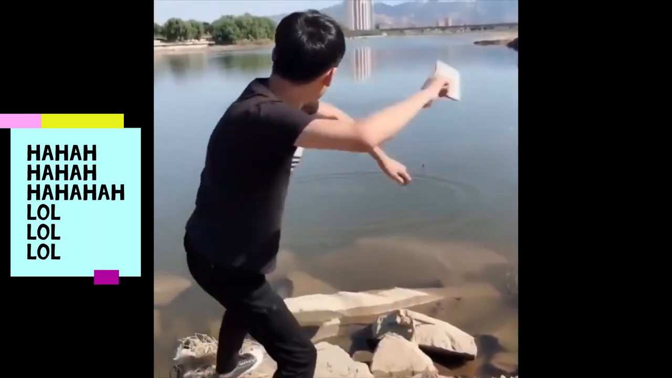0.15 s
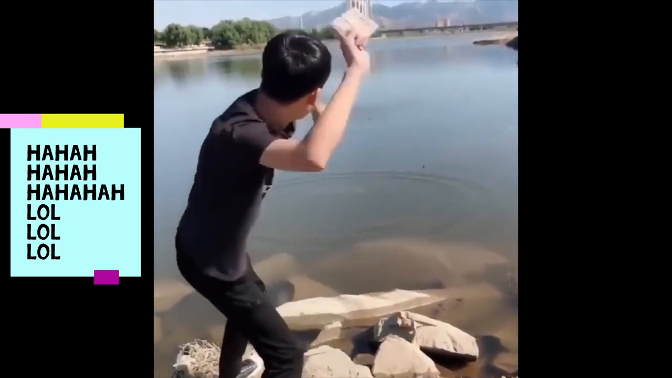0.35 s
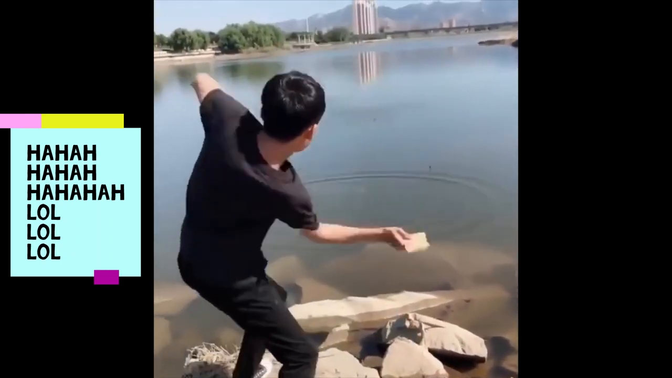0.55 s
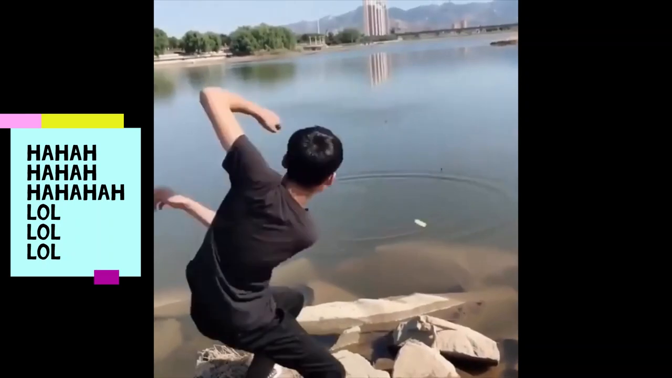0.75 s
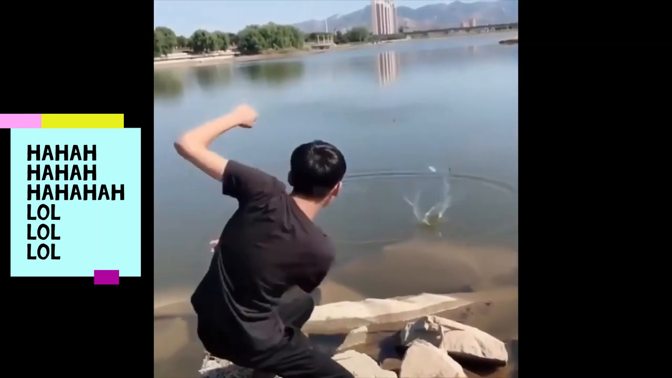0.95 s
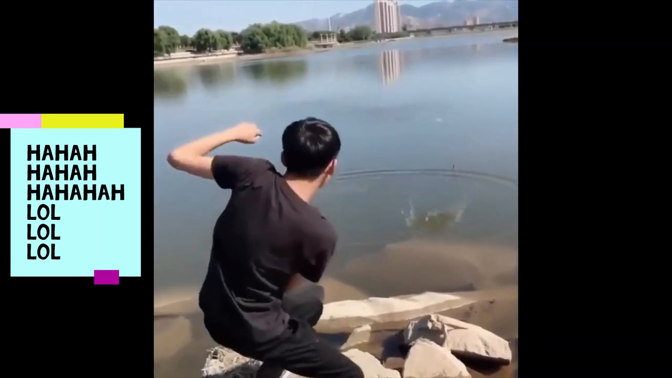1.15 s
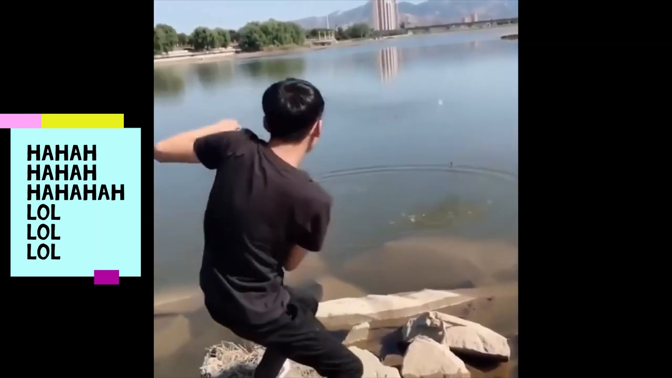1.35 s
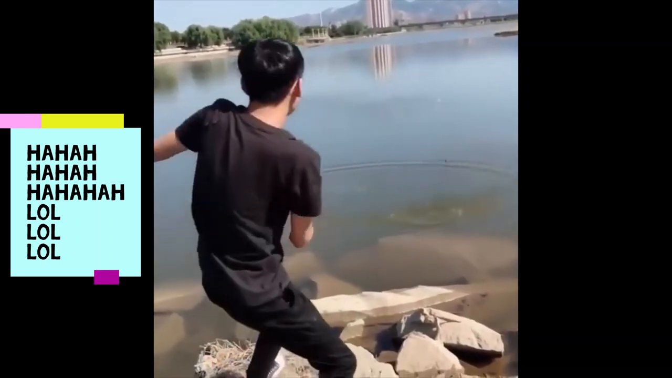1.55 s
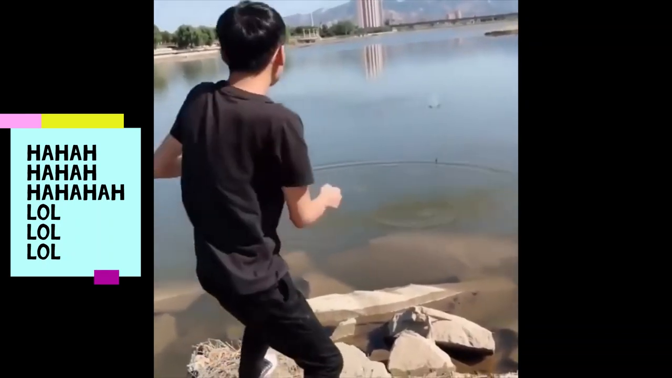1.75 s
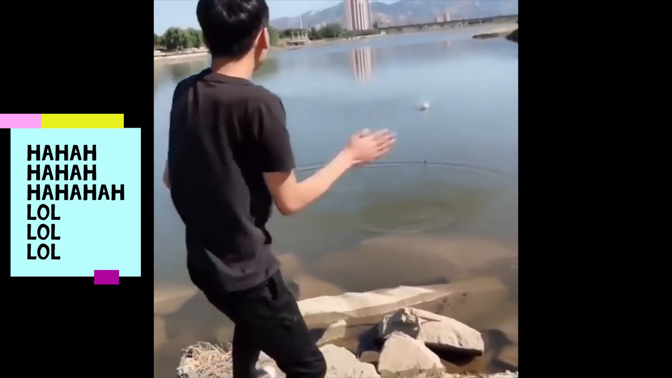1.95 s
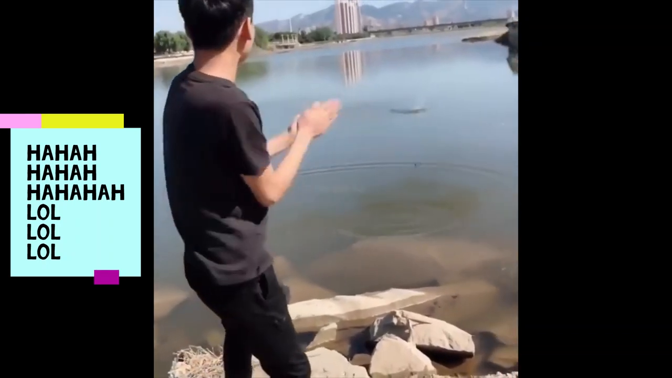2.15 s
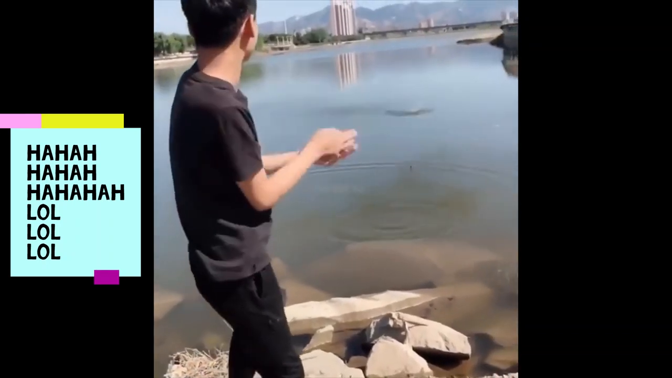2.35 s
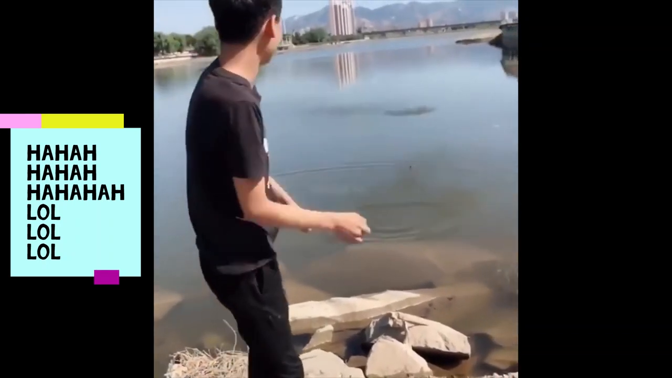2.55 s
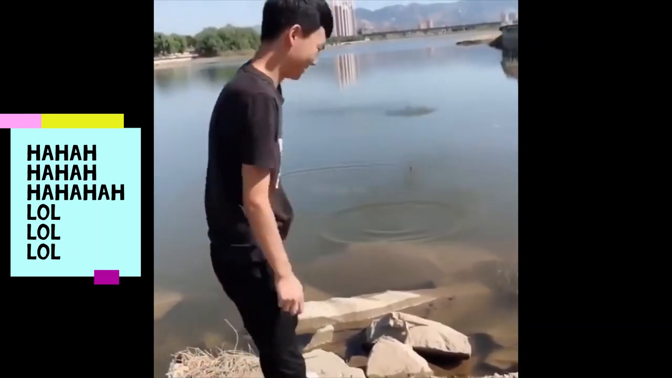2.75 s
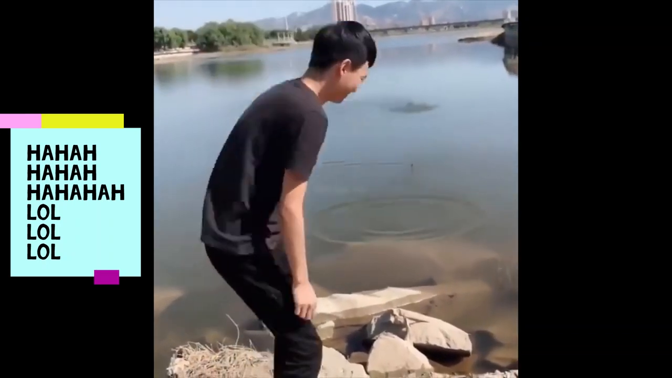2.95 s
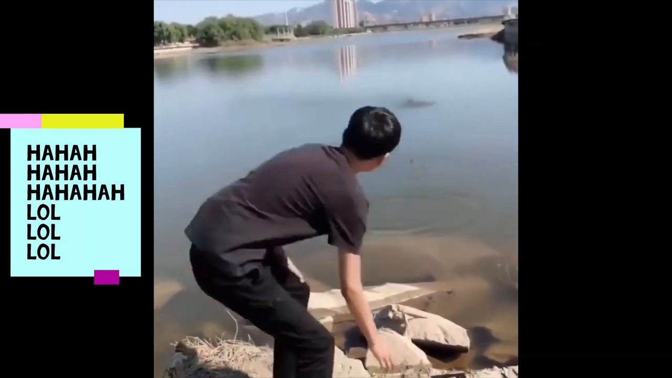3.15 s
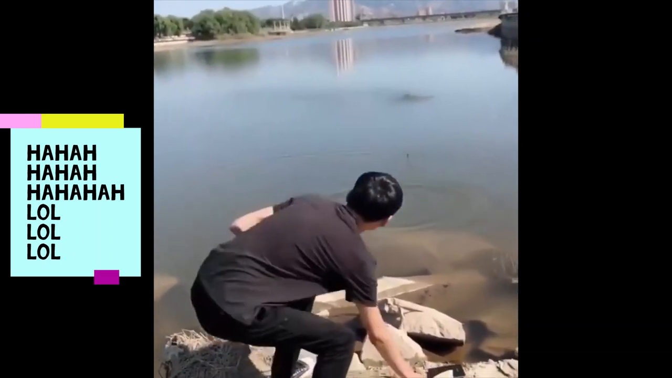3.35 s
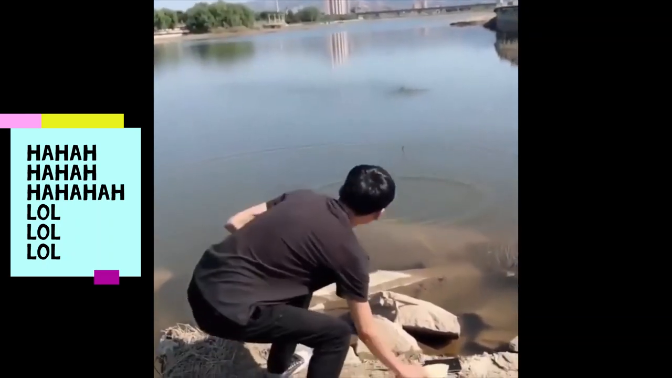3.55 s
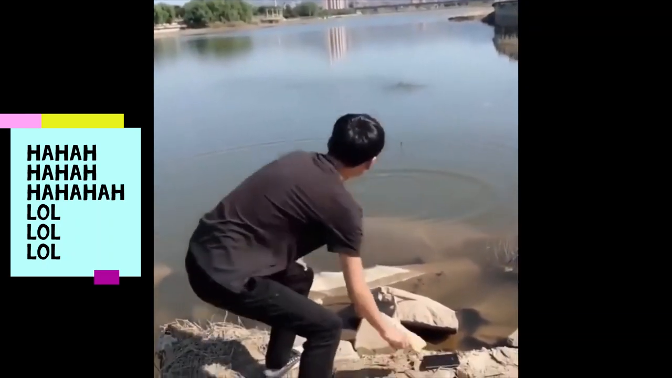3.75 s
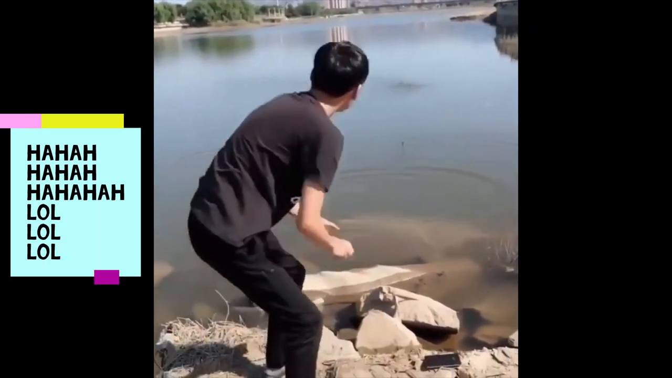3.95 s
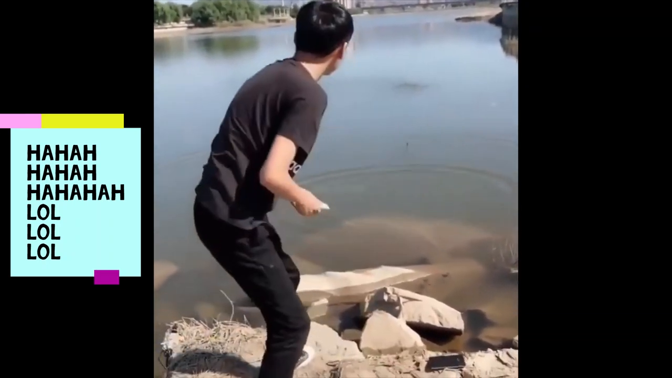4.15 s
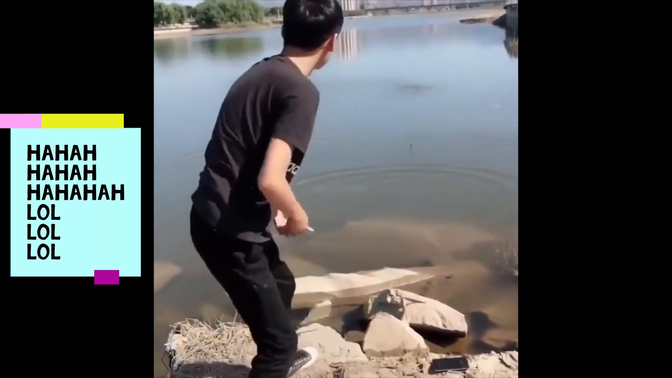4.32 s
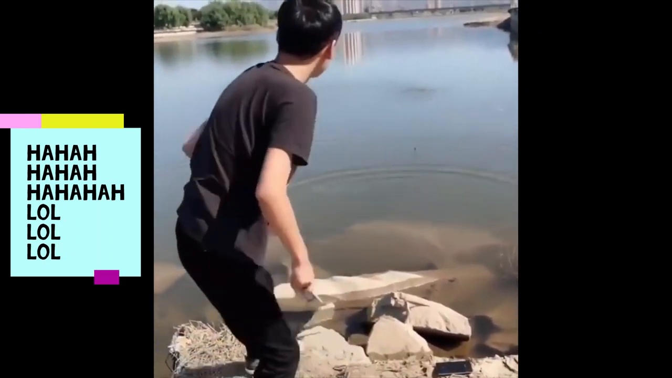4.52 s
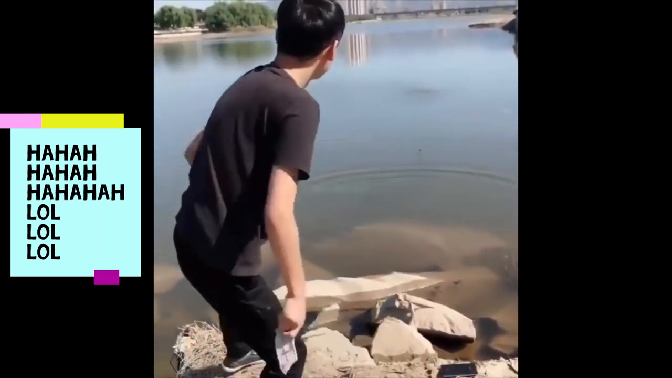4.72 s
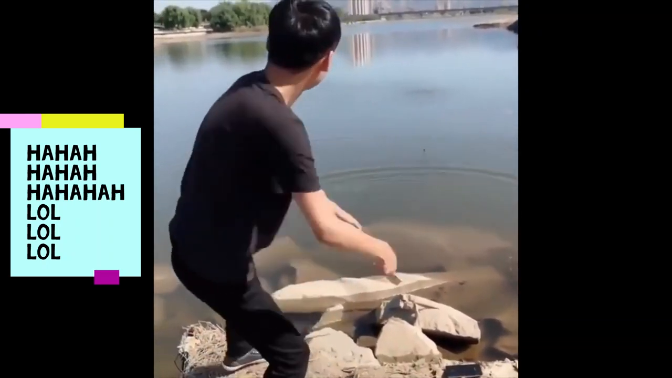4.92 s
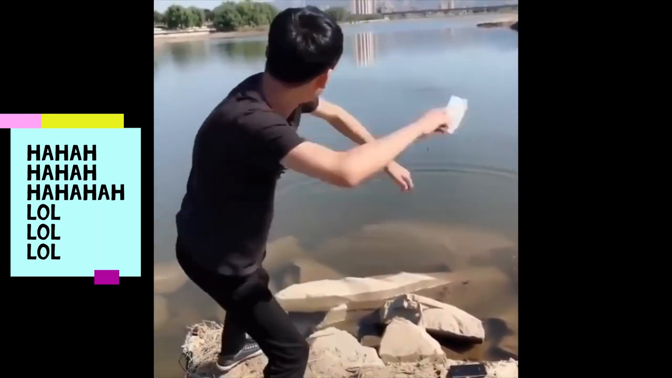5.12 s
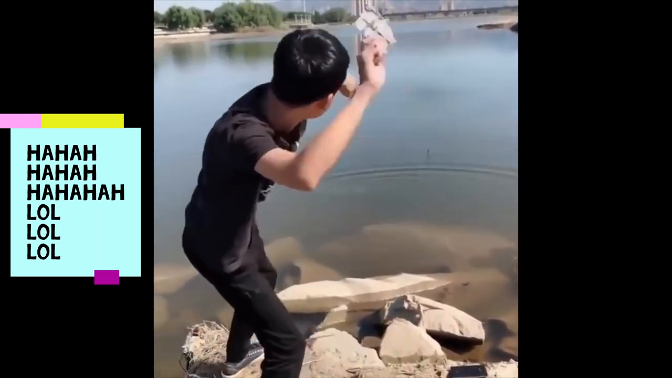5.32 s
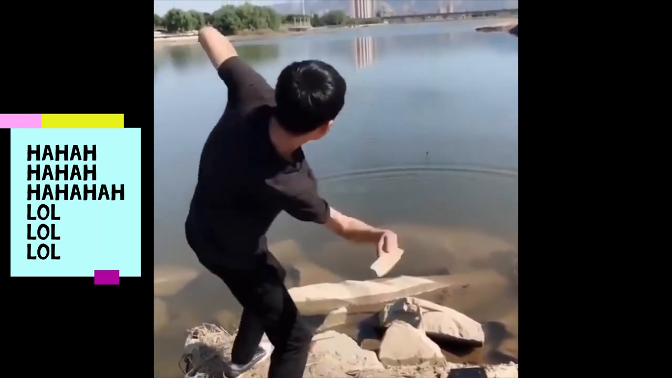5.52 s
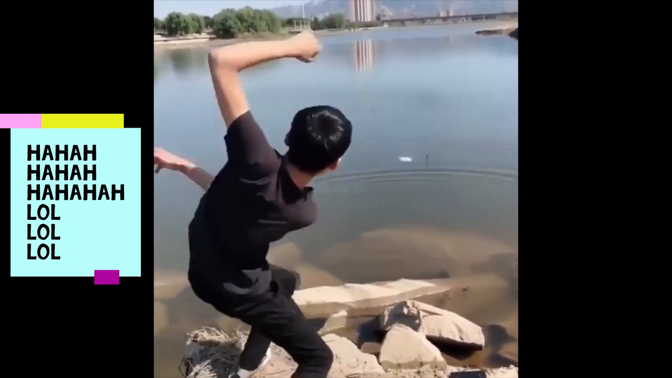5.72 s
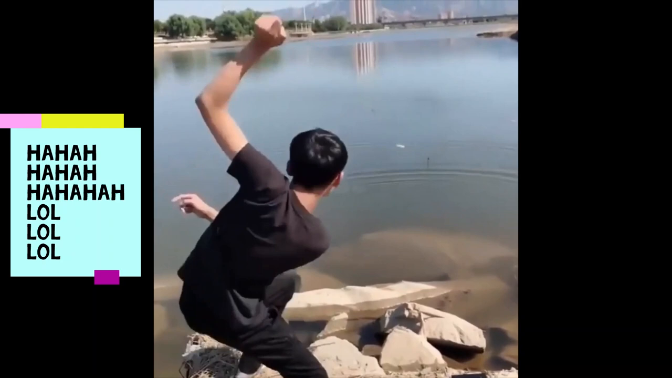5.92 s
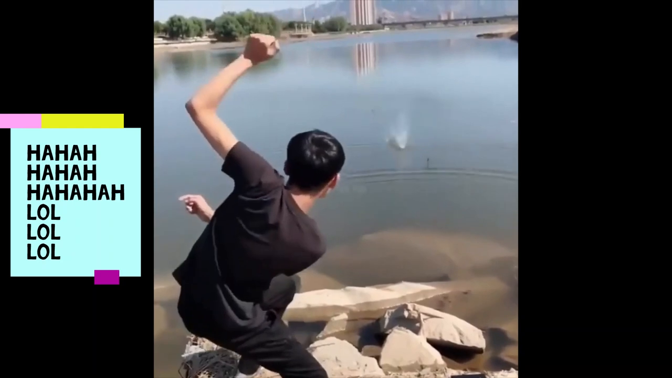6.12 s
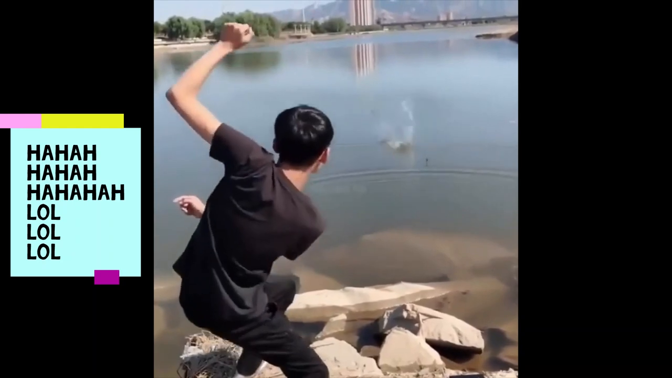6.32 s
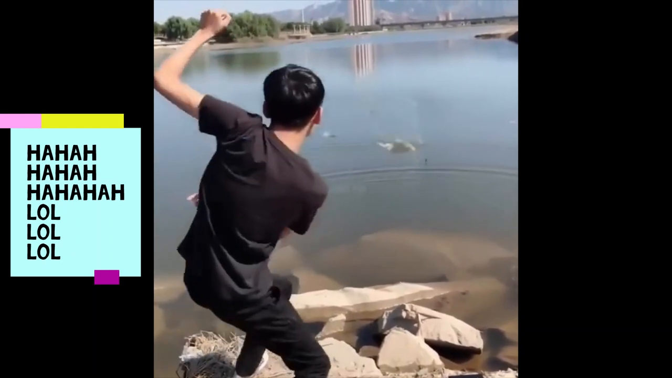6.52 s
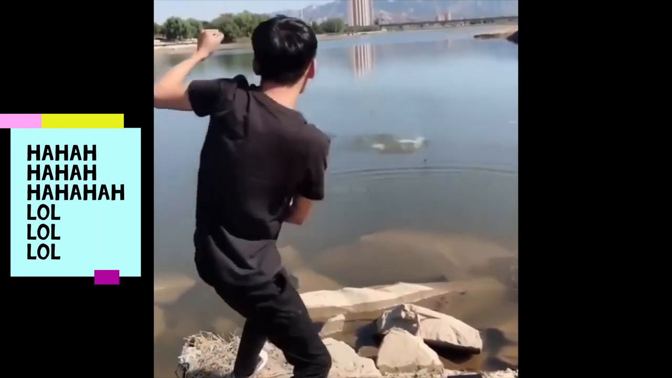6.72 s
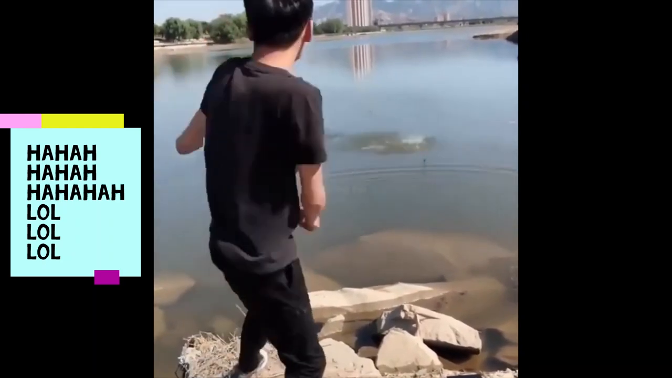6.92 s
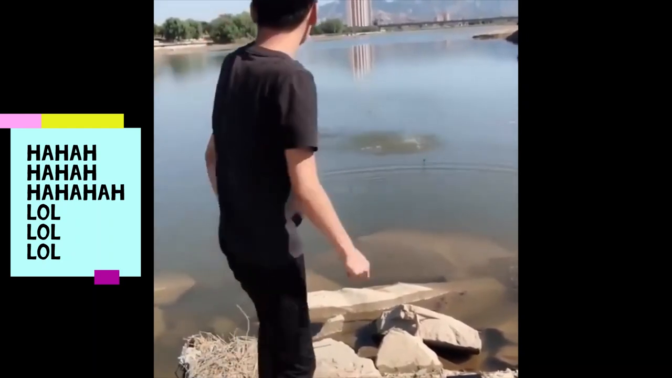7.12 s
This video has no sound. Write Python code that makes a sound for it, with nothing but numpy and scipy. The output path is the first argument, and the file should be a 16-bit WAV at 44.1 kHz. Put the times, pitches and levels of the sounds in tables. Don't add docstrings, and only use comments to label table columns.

```python
import sys
import numpy as np
from scipy import signal
from scipy.fft import rfft, irfft, next_fast_len
from scipy.io import wavfile
from scipy.ndimage import uniform_filter1d

SR = 44100
rng = np.random.default_rng(int(sys.argv[2]) if len(sys.argv) > 2 else 0)


def gain_from_db(level_db):
    decades = np.asarray(level_db, float) / 20
    return 10 ** decades


def file_out(sig):
    cols = np.atleast_2d(sig).T
    lim = np.clip(cols, -1, 1)
    pcm = np.round(lim * 32767).astype(np.int16)
    wavfile.write(sys.argv[1], SR, pcm)


N = 320950

# pitch_hz, level_db (per Hz)
CLOTH_COLOUR = [(2500, -35.5), (3600, -1), (4600, -7), (4900, -8), (5300, -1.5), (6900, -1), (7550, -5.5),
                (8300, -2.5), (9450, 0), (9750, -10), (12300, -8), (13800, -23.5), (15500, -26),
                (16200, -42.5)]
# pitch_hz, level_db (per Hz)
DROP_COLOUR = [(350, -23), (600, -19), (661, -24), (717, -17), (919, -27), (1080, -5.5), (4050, -10),
               (4500, -16), (4900, -25), (5300, -15.5), (8740, -18), (13600, -35), (15400, -44),
               (16000, -60)]


def unit(x):
    return x / np.sqrt(np.mean(x ** 2) + 1e-20)


def along(points, hz):
    f, v = np.transpose(points)
    return np.interp(np.log(hz + 1), np.log(f + 1), v)


def curves(rows):
    s, *cols = np.transpose(rows)
    return [np.interp(np.arange(N) / SR, s, c) for c in cols]


def filtered(x, response):
    m = next_fast_len(x.shape[-1] + 8192)
    return irfft(rfft(x, m) * response(np.fft.rfftfreq(m, 1 / SR)), m)[..., :x.shape[-1]]


def noise(response, size=N):
    m = next_fast_len(size)
    spectrum = rfft(rng.standard_normal(m)) * response(np.fft.rfftfreq(m, 1 / SR))
    return unit(irfft(spectrum, m)[:size])


def shape(spectrum):
    return lambda hz: gain_from_db(along(spectrum, hz))


def peak(centre_hz, width_hz):
    return lambda hz: 1 / (1 + ((hz - centre_hz) / width_hz) ** 2)


def held(rise, hold, t60, t):
    return np.clip(t / rise, 0, 1) ** 2 * gain_from_db(-60 * np.maximum(t - hold, 0) / t60)


def blow(rise, t60, t):
    return held(rise, rise, t60, t)


def hump(s, half):
    return np.exp(-((np.arange(N) / SR - s) / half) ** 2)


def add(track, s, x):
    track[round(s * SR):][:len(x)] += x


def grainy(per_s, spread_db, life):
    hits = (rng.random(N) < per_s / SR) * gain_from_db(spread_db * rng.exponential(size=N))
    decay = gain_from_db(-60 * np.arange(2000) / SR / life)
    return unit(signal.fftconvolve(hits, decay)[:N + 1999])[:N]


def patchy(x, depth_db):
    z = signal.stft(x, nperseg=256)[2]
    field = uniform_filter1d(rng.standard_normal(z.shape), size=4, axis=0)
    field = uniform_filter1d(field, size=10, axis=1)
    return unit(signal.istft(z * gain_from_db(depth_db * unit(field)), nperseg=256)[1][:N])


def town():
    # pitch_hz, level_db (per Hz)
    traffic_colour = [(12, -38), (20, -9), (70, 0.5), (98, -16), (193, -21.5), (221, -21), (259, -27),
                      (297, -22.5), (417, -29), (627, -33.5), (751, -35.5), (1780, -41.5), (2450, -47.5),
                      (3200, -55), (4500, -62), (5850, -85.5), (9900, -120)]
    # centre_s, swell_db, half_length_s
    lorries = [(0.087, 5, 0.31), (1.742, 13, 0.031), (2.16, 8.5, 0.15), (3.299, 2, 0.87),
               (5.603, 1.5, 0.87), (6.855, 10, 0.11)]
    # start_s, level_db, upper_lead_db
    idling = [(0.0, -45.5, 5), (0.83, -39, -6), (0.87, -55, 9), (1.05, -36.5, 9.5), (1.52, -45, -4),
              (1.58, -38, 1), (1.8, -41, -3), (2.55, -41.5, 3.5), (2.84, -51.5, -10), (2.96, -35, -5),
              (3.02, -45, 2), (4.3, -37, -4), (5.15, -41.5, -4), (5.21, -36.5, 4), (5.55, -45, -1),
              (5.73, -40, -4), (7.24, -47, 6.5), (7.28, -37, 17)]
    swell_db = sum(db * hump(s, half) for s, db, half in lorries)
    deep = noise(lambda hz: shape(traffic_colour)(hz) * (hz < 52))
    roar = noise(lambda hz: shape(traffic_colour)(np.maximum(hz, 98)) * (hz > 78))
    out = gain_from_db(-47 + swell_db) * deep + gain_from_db(-49 + 0.26 * swell_db + 1.5) * roar
    level_db, lead_db = curves(idling)
    for hz, lean in ((61.8, -.5), (70.44, .5)):
        drift_hz = 1.807 * noise(peak(0, 3.07))
        fading_db = 3.5 * noise(peak(0, 1.3))
        hum = np.sin(2 * np.pi * np.cumsum(hz + drift_hz) / SR)
        out = out + gain_from_db(level_db + lean * lead_db + fading_db - 1.0) * hum
    return out


def birds():
    # start_s, length_s, from_hz, to_hz, level_db
    whistles = [(.495, 0.086, 8500, 8240, -68), (.56, 0.11, 8250, 8900, -72), (.49, 0.07, 9280, 9100, -88),
                (0.54, 0.12, 8860, 9760, -70), (.605, 0.11, 9570, 9450, -77), (.715, .055, 8720, 8840, -71),
                (.92, 0.07, 8600, 9000, -70), (4.527, 0.086, 7770, 9950, -78), (4.93, .06, 9600, 9570, -71),
                (5.011, 0.06, 9650, 8800, -75), (5.06, 0.047, 9150, 7950, -74)]
    quaver_hz, quaver_depth_hz = 11.7, 70
    out = np.zeros(N + SR)
    for s, length, from_hz, to_hz, db in whistles:
        t = np.arange(0, length, 1 / SR)
        quaver = quaver_depth_hz * np.sin(2 * np.pi * quaver_hz * t)
        glide_hz = from_hz + (to_hz - from_hz) * t / length + quaver
        level = gain_from_db(db + 2.0 * noise(peak(0, 60), size=len(t))) * signal.windows.tukey(len(t), .6)
        add(out, s, level * np.sin(2 * np.pi * np.cumsum(glide_hz) / SR))
    return out[:N]


def rustle():
    # centre_s, strength_db, half_length_s, airy_top_db
    moves = [(0.253, -92, 0.27, -1), (0.543, -76.5, 0.23, -7), (0.855, -73.5, 0.084, 1),
             (1.11, -71.5, 0.12, -6), (1.547, -68, 0.15, -15), (1.844, -75, 0.11, -12),
             (2.11, -73.5, 0.14, -5), (2.376, -65.5, 0.07, -1), (2.655, -70, 0.091, -25),
             (2.55, -67.5, 0.29, -32), (2.966, -67, 0.12, -5), (3.478, -73, 0.095, -6.5),
             (3.693, -71.5, 0.11, -10), (3.832, -82, 0.055, -6), (4.738, -71.5, 0.096, -11),
             (4.926, -79, 0.09, -10), (5.556, -80.5, 0.1, -5), (5.845, -78.5, 0.22, -6.5),
             (5.912, -71.5, 0.052, -3), (6.114, -74, 0.12, -5), (6.902, -64.5, 0.4, -14.5)]
    swells = [gain_from_db(db) * hump(s, half) for s, db, half, _ in moves]
    moving = sum(swells)
    body = gain_from_db(-78) + moving
    air = gain_from_db(-89) + sum(gain_from_db(move[-1]) * swell for move, swell in zip(moves, swells))
    body = body * patchy(noise(lambda hz: shape(CLOTH_COLOUR)(hz) * (hz < 9750)), depth_db=3.5)
    air = air * noise(lambda hz: shape(CLOTH_COLOUR)(hz) * (hz >= 9750))
    sleeve = patchy(noise(lambda hz: peak(3000, 900)(hz) ** 2), depth_db=4.0)
    sleeve = gain_from_db(-1.5) * moving * sleeve
    return (body + air + sleeve) * unit(1 + 0.12 * grainy(330, 3.7, life=0.036))


def swish():
    # start_s, pitch_hz, level_db
    swing_arch = [(4.56, 9300, -74), (4.63, 10500, -76), (4.7, 11600, -76), (4.76, 11900, -69),
                  (4.81, 10900, -68.5), (4.87, 10600, -74), (4.95, 9560, -86)]
    hz, db = curves(swing_arch)
    swinging = np.abs(np.arange(N) / SR - 4.755) < .195
    flutter = noise(lambda hz: peak(0, 1100)(hz) ** 2) * swinging
    return gain_from_db(db) * flutter * np.sin(2 * np.pi * np.cumsum(hz) / SR)


def thin_hiss():
    # start_s, level_db, t60_s
    puffs = [(.871, -76, .2), (1.026, -74, .2), (1.157, -60, 0.14), (1.38, -84, 1.0), (1.55, -83, .8),
             (2.31, -72, 0.28), (2.396, -56, 0.15), (2.627, -61, 0.21), (2.965, -68, .2), (3.64, -70, .2),
             (3.795, -68, .2), (5.86, -70, 0.22), (6.357, -64, .2)]
    out, t = np.zeros(N + SR), np.arange(12000) / SR
    for s, db, t60 in puffs:
        hiss = noise(lambda hz: peak(14300, 2000)(hz) ** 2 * (hz < 16000), size=len(t))
        add(out, s, gain_from_db(db) * blow(.006, t60, t) * hiss)
    return out[:N]


def contacts(rows, rise, t60, trim_db):
    # start_s, level_db
    grit_top = [(1.25, -24), (1.35, -45), (2.36, -45), (2.4, -24)]
    lead_s = .012
    out, t = np.zeros(N + SR), np.arange(0, .07 + t60, 1 / SR)
    for s, db, dull_db, bright_hz in rows:
        top = gain_from_db(np.interp(s, *np.transpose(grit_top)))

        def bright_colour(hz):
            puff = shape(CLOTH_COLOUR)(hz) * (0.41 + peak(bright_hz, 1500)(hz)) / (1 + (hz / 12500) ** 6)
            return puff + top * peak(13500, 2000)(hz)

        bright = noise(bright_colour, size=len(t))
        dull = noise(lambda hz: peak(1900, 1400)(hz) * (hz > 800) / (1 + (hz / 4500) ** 4), size=len(t))
        swell = blow(rise, t60, t - lead_s) + gain_from_db(-16.5) * blow(0.0028, 0.055, t)
        add(out, s - lead_s - rise / 2, gain_from_db(db + trim_db) * swell * (bright + gain_from_db(dull_db) * dull))
    return out[:N]


def ticks():
    # start_s, peak_db, dull_part_db, bright_hz
    grit = [(0.7043, -57, -8, 9220), (0.7173, -51.5, 1, 8750), (0.9148, -48, -1.5, 9100),
            (1.1964, -49.5, -1, 5700), (2.164, -43, 0.5, 6540), (2.2533, -46.5, 3.5, 6640),
            (2.3411, -42.5, -6, 9380), (2.359, -50, -10, 6000), (2.6464, -44, 9, 3700),
            (3.6546, -36, -1.5, 5970), (3.7439, -41, 2, 9000), (3.7738, -53, -4, 7460),
            (3.7964, -57, -16, 6660), (3.8744, -60, -6.5, 5340), (4.1345, -60, 2, 4670),
            (4.7027, -56, 8.5, 9520), (4.7466, -54, -0.5, 5940), (6.3935, -40, 2.5, 6450),
            (6.4204, -63, 16, 6840), (7.2734, -53, -13, 3960)]
    patter = [(1.5115, -50, -1, 3850), (1.5274, -51, 4.5, 8300), (1.5713, -42, -4, 6600),
              (1.5973, -49.5, -11, 6240), (1.6144, -51, 5, 3550), (1.6392, -55, -14, 3570),
              (1.662, -42.5, -7, 7200), (1.7383, -47, -19, 7220), (1.7659, -39.5, -18, 6000),
              (1.784, -45.5, -13, 8300), (1.8276, -51, -12, 6240), (1.8596, -49, 1, 6280),
              (1.9126, -56, 1, 9070),
              (1.028, -48, -11, 9000), (1.033, -56, -8, 8000), (1.038, -49.5, -1, 9000),
              (1.043, -53, -8, 9000), (1.412, -57, -10, 6800), (1.49, -58, -10, 8000),
              (1.579, -47, -12, 6000), (1.678, -59, -14, 8900), (1.703, -59, -10, 6000),
              (1.73, -54, -8, 4000), (1.853, -56, -14, 9200), (1.877, -49.5, -2, 8040),
              (1.924, -56, -8, 7000), (3.843, -57, -14, 6500), (3.864, -61, -14, 7000),
              (3.886, -61, -12, 6000)]
    scuffs = [(0.8714, -32, -23, 7700), (0.8844, -50, 10, 8050), (1.4107, -53, 9, 9200),
              (1.438, -48, 8, 4200), (1.4738, -50, 8, 5330), (1.505, -52, 11, 3400),
              (1.5488, -54, 10, 6350), (2.0123, -29.5, -4, 5390), (2.0344, -42, 5, 6350),
              (2.0522, -36, 4, 3460), (2.1744, -39.5, -2, 3840), (2.2614, -50, 12, 3790),
              (2.3131, -37, 3, 6200), (2.9644, -29.5, -7.5, 6300), (2.9736, -37, -15, 5500),
              (3.4211, -43.5, 1, 8500), (3.6434, -38, 1, 7000), (3.7065, -50, 7, 7320),
              (3.808, -42, -20, 8700), (4.7651, -46, 6, 5720), (4.9392, -51, 10, 9600),
              (5.6494, -49, -13, 8620), (5.8614, -42, -4, 5500), (6.1125, -43.5, 1, 9300),
              (6.1494, -47, 8, 6060), (6.6568, -39, -10, 8500), (6.8314, -55, -2, 4020),
              (6.9094, -34.5, -5, 5390), (7.0903, -39, 2, 6860), (7.1516, -35, 3, 4030)]
    sharp = contacts(grit, rise=.0015, t60=0.026, trim_db=-2.5)
    thin = contacts(patter, rise=0.00077, t60=0.012, trim_db=-3.5)
    return sharp + thin + contacts(scuffs, rise=0.0075, t60=0.1, trim_db=-17.0)


def stones():
    # start_s, peak_db, pitch_factor, ring_length_factor, lower_stone_db
    chinks = [(3.716, -51, 1.0, .7, 4), (3.729, -40, 1.0, .6, 4), (3.8117, -39, 1.0, .9, -11),
              (3.826, -50, 1.0, .4, -14), (3.863, -62, 1.0, .4, -10), (3.908, -60, 1.0, .6, -12),
              (3.93, -54, 1.0, .45, -4), (4.48, -60, .99, 1.5, 0), (5.869, -43, 1.015, .3, -8),
              (5.8765, -41, .958, 1.2, 2), (5.8915, -52, .964, 1.0, 7), (5.909, -53, .975, .8, 3)]
    # pitch_hz, level_db, t60_s, lower (1 = of the lower stone, -1 = weaker as the lower stone grows)
    slate = [(2280, 0, .1, 1), (3500, -9, .03, 1), (5660, 0, .075, 0), (7350, -3, .04, 1),
             (9800, -6, .035, 1), (6850, -9, .03, 0), (8700, -14, .03, -1), (11800, -13, .04, 0)]
    out, t = np.zeros(N + SR), np.arange(8000) / SR
    for s, db, pitch, length, lower_db in chinks:
        for hz, mode_db, t60, lower in slate:
            rough = 1 + 0.55 * noise(peak(0, 220), size=len(t))
            ring = blow(.001, t60 * length, t) * rough * np.sin(2 * np.pi * hz * pitch * t)
            add(out, s, gain_from_db(db + mode_db + lower * lower_db - 10) * ring)
        scrape = blow(0.0014, 0.015, t) * noise(shape(CLOTH_COLOUR), size=len(t))
        add(out, s, gain_from_db(db - 13) * scrape)
    return out[:N]


def spray():
    # start_s, level_db
    rain = [(6.45, -53), (6.544, -78), (6.652, -64), (6.662, -59.5), (6.692, -66), (6.784, -50),
            (7.272, -57.5), (7.278, -56)]
    onset = np.clip((np.arange(N) / SR - rain[0][0]) / 0.042, 0, 1)
    level = gain_from_db(curves(rain)[0]) * onset
    hiss = patchy(noise(shape(DROP_COLOUR)), depth_db=2.0) * unit(1 + .4 * grainy(700, 3, life=.012))
    drips, t = np.zeros(N + SR), np.arange(1500) / SR
    for when, pitch, size in rng.random((120, 3)):
        hz = 1000 * 4.5 ** pitch
        drip = blow(0.0011, 45 / hz, t) * np.sin(2 * np.pi * hz * t * (1 + 6 * t))
        add(drips, 6.6 + .68 * when, gain_from_db(10 * size) * drip)
    return level * (hiss + gain_from_db(-24) * drips[:N])


def water():
    # start_s, peak_db, rise_s, t60_s, colour_hz
    splashes = [(1.1553, -31, 0.0015, 0.12, 5000), (1.1605, -23, 0.0041, 0.02, 6800),
                (1.1635, -22, 0.0013, .018, 3200), (1.176, -39, .002, 0.027, 6500),
                (6.3574, -36, 0.006, 0.11, 9000), (6.364, -35, 0.013, 0.032, 7500),
                (6.367, -32, 0.0066, 0.12, 3000), (6.375, -31, 0.0058, 0.047, 1700),
                (6.391, -43.5, 0.002, 0.24, 4870)]
    # pitch_hz, level_db (per Hz)
    tear_colour = [(290, -37), (500, -1), (740, -1), (1480, 0), (1870, -6), (2730, 0.5), (4300, -6.5),
                   (4950, -10.5), (5500, -1.5), (6700, 1), (7640, -8), (8960, 0.5), (16000, -29)]
    # start_s, peak_db, pitch_hz, t60_s
    short_rings = [(1.527, -41, 2850, .018), (1.529, -45, 3400, .014), (5.976, -48, 2450, .015),
                   (1.572, -48, 1450, .02), (2.163, -29, 350, .05), (2.164, -33, 420, .04),
                   (3.7435, -40, 1320, .028), (3.7445, -42, 2110, .03), (3.7445, -39, 3200, .012),
                   (2.623, -25, 285, .022), (2.6245, -27, 420, .018), (2.6248, -26, 560, .024),
                   (3.72, -49, 3450, .02), (3.729, -44, 3450, .022), (3.758, -47, 1500, .02),
                   (3.752, -47, 2400, .02), (1.166, -33, 1300, .014), (1.512, -50, 2700, .015),
                   (1.539, -49, 2200, .02), (7.152, -43, 2600, .025), (7.156, -44, 3250, .02),
                   (7.179, -48, 3000, .015), (7.182, -52, 5400, .02), (5.976, -58, 5900, .012),
                   (6.3923, -19.5, 1130, .011), (6.3972, -33, 1050, .012), (6.393, -32, 560, .03),
                   (6.4208, -38, 1100, .008), (6.428, -42, 750, .03), (6.437, -43, 1000, .025),
                   (6.448, -45, 850, .025), (6.655, -42, 1230, .06), (6.868, -42, 1150, .04),
                   (6.952, -46, 1200, .04)]
    out, t = np.zeros(N + SR), np.arange(10000) / SR
    for s, db, rise, t60, hz in splashes:
        tear = noise(lambda f: shape(tear_colour)(f) * (0.2 + peak(hz, .6 * hz)(f)), size=len(t))
        add(out, s, gain_from_db(db - 8.0) * blow(rise, t60, t) * tear)
    gurgle = noise(peak(560, 530), size=len(t)) * blow(0.0046, 0.18, t)
    add(out, splashes[-1][0] + 0.0072, gain_from_db(-42) * gurgle)
    for s, db, hz, t60 in short_rings:
        rising = np.sin(2 * np.pi * hz * t * (1 + 2.0 * t))
        add(out, s, gain_from_db(db) * blow(1.7 / hz, t60, t) * rising)
    return out[:N]


def slaps():
    # start_s, peak_db, hold_s, t60_s, top_db
    claps = [
        [(2.3957, -5.5, .0005, .009, -12), (2.3995, -8, .0026, .013, 6)],
        [(2.6266, -9, .001, .008, 0), (2.6303, -16, .002, .03, -1)],
    ]
    # pitch_hz, level_db (per Hz)
    palm_colours = [
        [(180, -49.5), (480, -33.5), (780, -24.5), (1000, -9), (2200, -7), (3090, -14.5), (3900, -10.5),
         (5000, -13.5), (9400, -14.5), (10500, -20.5), (13700, -25), (16500, -42)],
        [(88, -31), (150, -18.5), (800, -28), (1100, -3), (1800, -2.5), (2300, -6.5), (3300, -1), (4600, -2.5),
         (6420, -4.5), (8500, -0.5), (10500, -7), (12300, -7.5), (16500, -31)],
    ]
    # pitch_hz, level_db (over the crack), t60_s
    cupped_air = [
        [[(1700, 4, 0.011), (1030, -2.5, 0.014), (3850, 1.5, 0.006), (8160, 1, .006)], [(2240, 3.5, .008),
         (610, -15, .02), (1450, -7, .01), (7400, -4.5, .006), (9260, -4, .008), (5510, -9, 0.014),
         (6390, -7.5, .008)]],
        [[(1580, 1, 0.0028), (3600, 1.5, 0.0024), (1200, -3, 0.016), (8200, 3, .005), (5300, -4, 0.0046)],
         [(1570, -5, 0.034), (4600, -4.5, 0.01), (6130, -7.5, .015), (8700, -3.5, .015), (6980, -5, .015),
         (12300, -12.5, 0.022)]],
    ]
    # delay_s, level_db (re the slap), t60_s
    finger_taps = [
        [(.0115, -22.5, .03), (.0413, -21, 0.016), (.064, -35, 0.031)],
        [(.0416, -27.5, .02), (.07, -41.5, 0.028)],
    ]
    out, t = np.zeros(N + SR), np.arange(12000) / SR
    for pair, palm, cups, rebounds in zip(claps, palm_colours, cupped_air, finger_taps):
        start, loudest_db = pair[0][:2]
        lead_in = blow(.006, .02, t) * noise(shape(palm), size=len(t))
        add(out, start - .006, gain_from_db(-35) * lead_in)
        rub = gain_from_db(-33.5) * blow(0.0067, 0.044, t) + gain_from_db(-44.5) * blow(.003, .3, t)
        add(out, start, rub * noise(shape(palm), size=len(t)))
        for (s, db, hold, t60, top_db), modes in zip(pair, cups):
            crack = noise(lambda hz: shape(palm)(hz) * gain_from_db(top_db * (hz > 9700)), size=len(t))
            crack = crack * held(0.00035, hold, t60, t)
            cup = sum(gain_from_db(cup_db) * held(.0003, hold, ring, t) * np.sin(2 * np.pi * hz * t)
                      for hz, cup_db, ring in modes)
            add(out, s, gain_from_db(db - 9.5) * (crack + cup))

        def tap_colour(hz):
            skin = shape(palm)(hz) * (hz > 800)
            return skin * (.4 + peak(5500, 2000)(hz) * 1.5) / (1 + (hz / 9500) ** 6)

        for delay, db, t60 in rebounds:
            tap = noise(tap_colour, size=len(t)) * blow(0.00091, t60, t)
            hollow = gain_from_db(-12) * noise(peak(2013, 200), size=len(t)) * blow(.004, 0.14, t)
            add(out, start + delay, gain_from_db(loudest_db + db - 4.5) * (tap + hollow))
    return out[:N]


def scene():
    palms, splash = slaps(), water()
    near = rustle() + swish() + ticks() + palms + stones() + thin_hiss()
    mid = near + splash + spray() + town() + birds()
    scatter = rng.standard_normal(400) * gain_from_db(-np.arange(400) / 4)
    scattered = np.convolve(np.roll(near + splash, 25), scatter / np.linalg.norm(scatter))[:N]
    side = filtered(scattered, shape([(2000, -90), (3500, -51.5), (4400, -11), (6500, -19), (9000, -18),
                                      (12500, -7.5)]))
    first = palms * (np.arange(N) / SR < 2.42)
    side = side + filtered(np.roll(first, 40), shape([(300, -89), (450, -54.5), (700, -23.5), (3000, -22),
                                                      (4400, -24.5), (6000, -40.5)]))
    return np.array([mid + side, mid - side])


def thrifty(x, floor_db):
    # from_s, to_s
    all_mono = [(.59, .67), (1.31, 1.36), (1.48, 1.52), (1.67, 1.71), (3.67, 3.72), (6.395, 6.93),
                (6.97, 7.26)]
    hz, t, (mid, side) = signal.stft([x[0] + x[1], x[0] - x[1]], SR, nperseg=2048)
    band = (hz // 690).astype(int)
    bands = np.arange(band[-1] + 1)

    def power(z):
        return np.array([np.mean(np.abs(z[band == b] / 2) ** 2, axis=0) for b in bands])

    kept = (hz < 11700)[:, None] | (power(mid)[band] > gain_from_db(2 * floor_db))
    kept = kept * ((hz < 15850)[:, None] | (abs(t - 2.627) < .025))
    luck = uniform_filter1d(rng.standard_normal((len(bands), len(t))), size=2, axis=1)
    chance = gain_from_db(2 * 6 * luck)
    favour = gain_from_db(2 * 9.5 * (abs(bands - 17) < 4))[:, None]
    wide = (power(side) * chance * favour > gain_from_db(2 * -108))[band]
    mono = np.any([(t > a) & (t < b) for a, b in all_mono], axis=0)
    side = side * wide * ~mono
    return signal.istft(np.array([mid + side, mid - side]) * kept / 2, SR, nperseg=2048)[1][:, :N]


def band_limit(x):
    return signal.sosfilt(signal.butter(12, 16670, fs=SR, output="sos"), x)


def record(dry):
    # centre_s, depth_db
    starved = [
        (6.638, -13),
        (6.707, -35),
        (6.853, -14),
        (7.066, -23),
        (7.215, -22),
    ]
    left_hz = [
        (1250, 2150, 4400, 6100, 7800),
        (1500, 1900, 3950, 6950, 8700),
        (450, 1100, 1600, 1800, 2250, 3750, 4050, 6900, 8600),
        (450, 1500, 1850, 2550, 3350, 5250, 6950),
        (1000, 1400, 1700, 2150, 6900, 8600, 9250, 9600),
    ]
    left_level_db = [-63, -58.5, -51, -56.5, -54.5]
    dry = dry / (1 + np.abs(dry / .68) ** 4) ** .25
    treble = filtered(dry, lambda hz: 1 / (1 + (700 / (hz + 1)) ** 6))
    t, wet = np.arange(N) / SR, dry.copy()
    for (s, depth_db), lines, left_db in zip(starved, left_hz, left_level_db):
        bell = lambda width: np.exp(-((t - s) / width) ** 4)
        wet -= (1 - gain_from_db(depth_db)) * bell(.007) * treble
        for hz in lines:
            level_db = left_db + along(DROP_COLOUR, hz) / 2 + rng.normal(0, 2)
            wet += gain_from_db(level_db) * np.sin(2 * np.pi * hz * t) * bell(.015)
    mix = thrifty(wet, floor_db=-116)
    return band_limit(mix)


dry = scene()
out = record(dry)
file_out(out)
```